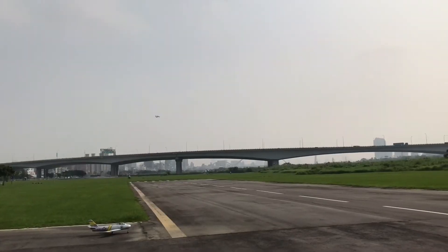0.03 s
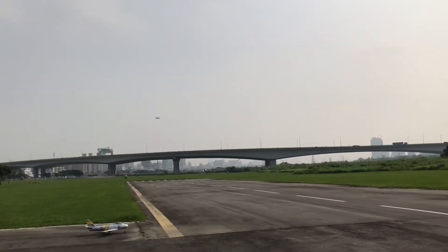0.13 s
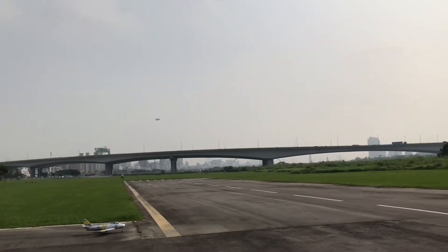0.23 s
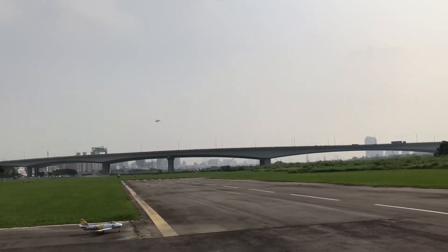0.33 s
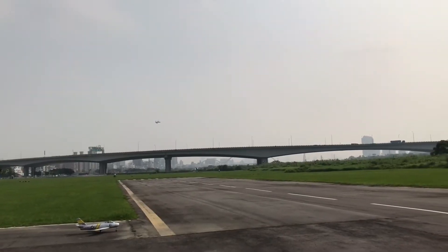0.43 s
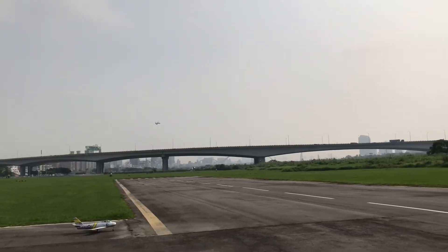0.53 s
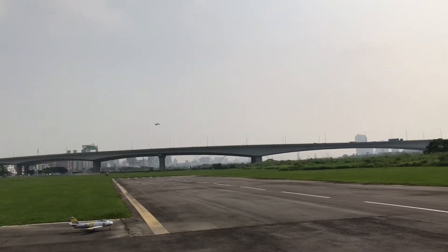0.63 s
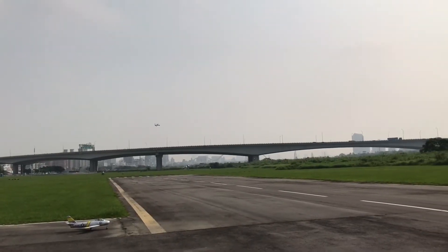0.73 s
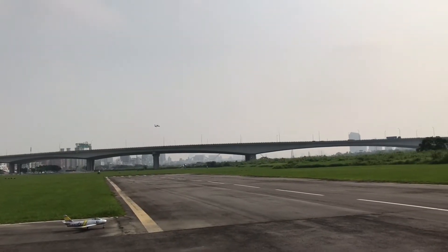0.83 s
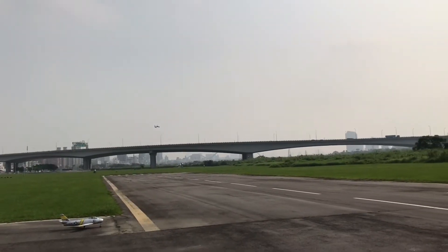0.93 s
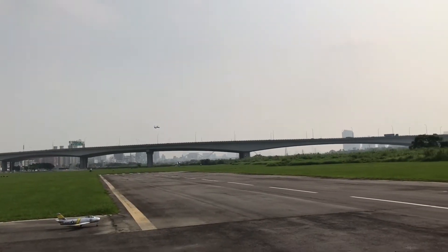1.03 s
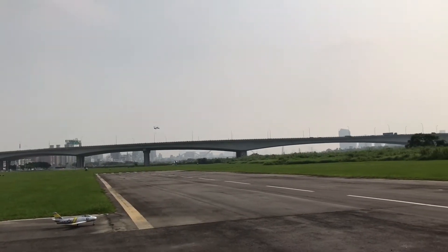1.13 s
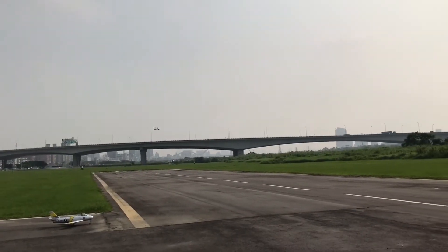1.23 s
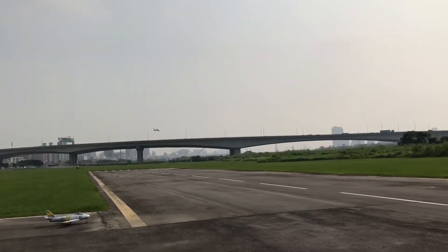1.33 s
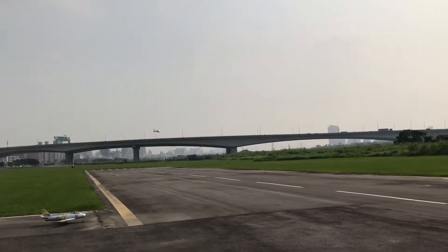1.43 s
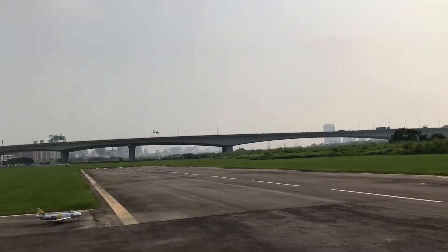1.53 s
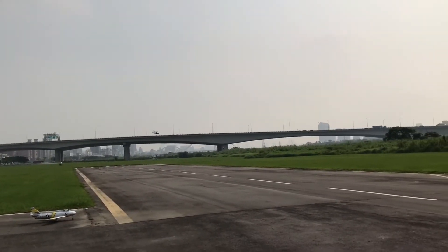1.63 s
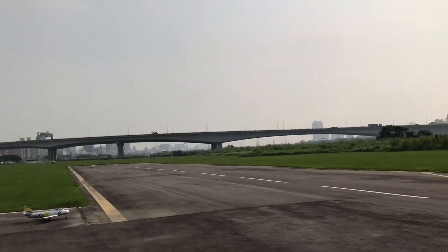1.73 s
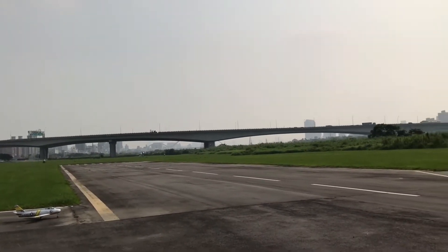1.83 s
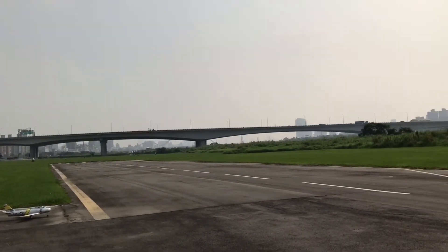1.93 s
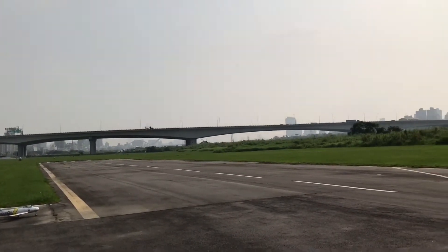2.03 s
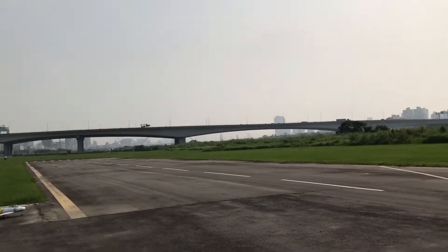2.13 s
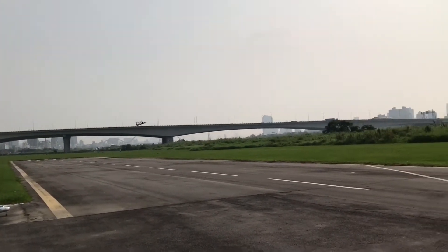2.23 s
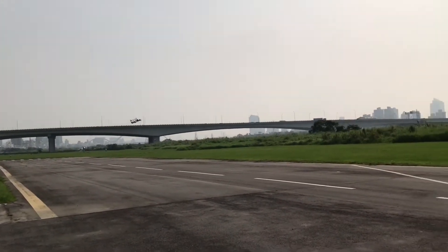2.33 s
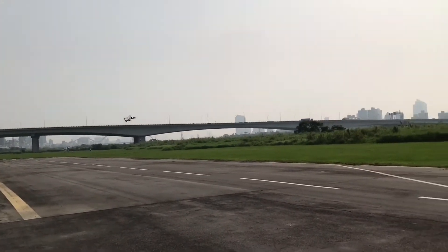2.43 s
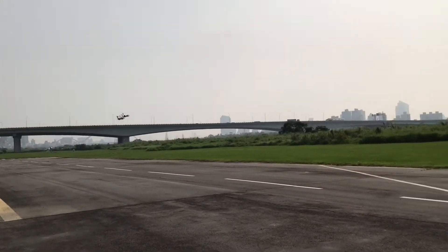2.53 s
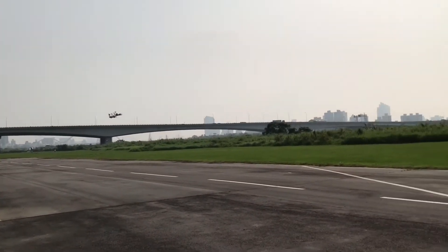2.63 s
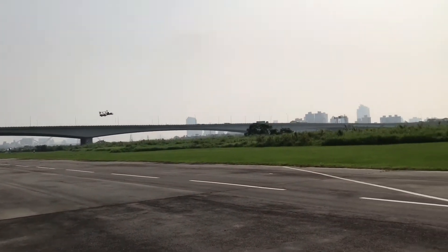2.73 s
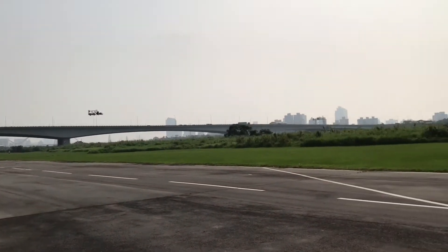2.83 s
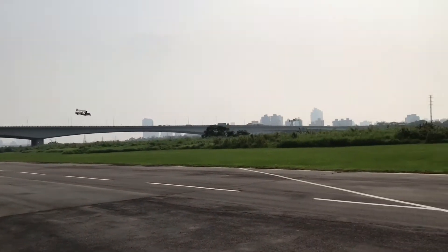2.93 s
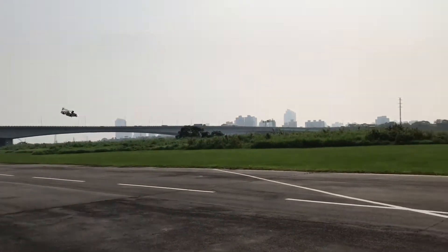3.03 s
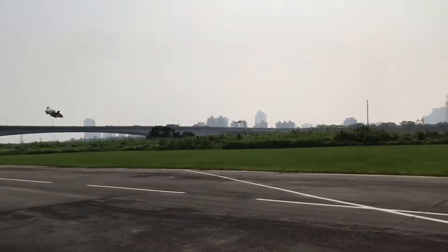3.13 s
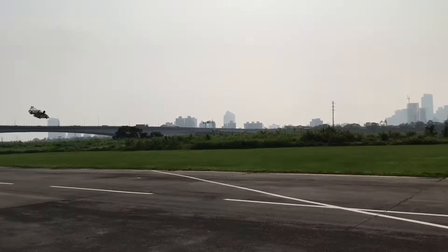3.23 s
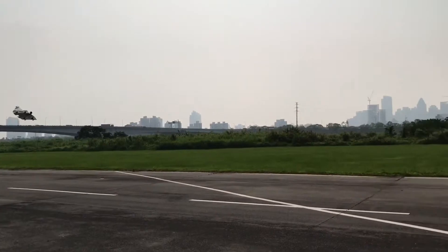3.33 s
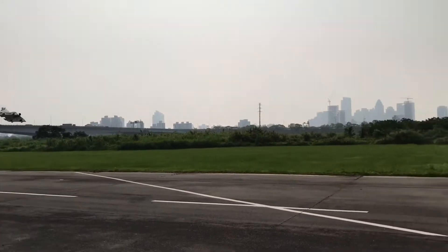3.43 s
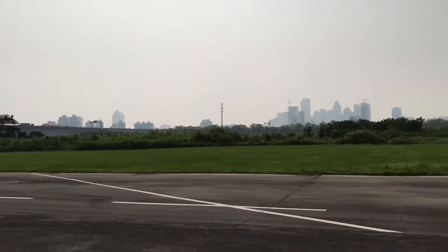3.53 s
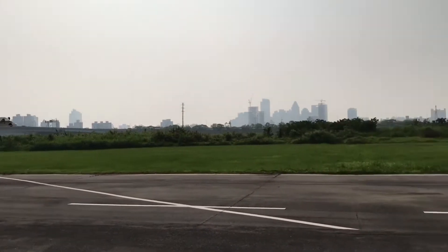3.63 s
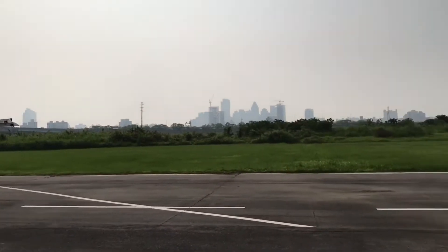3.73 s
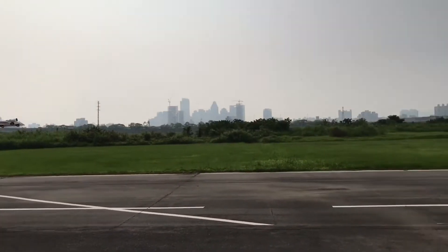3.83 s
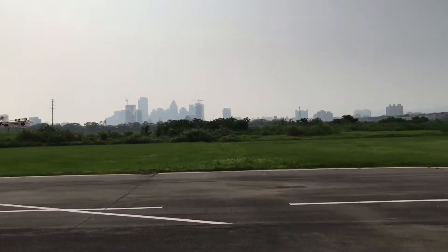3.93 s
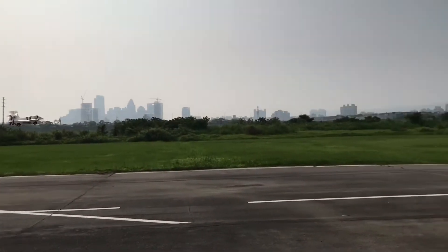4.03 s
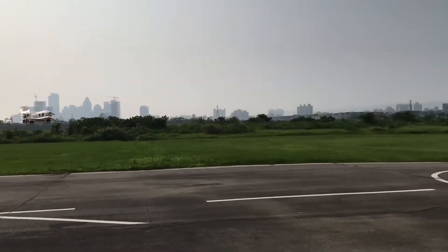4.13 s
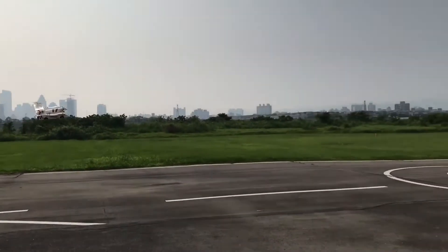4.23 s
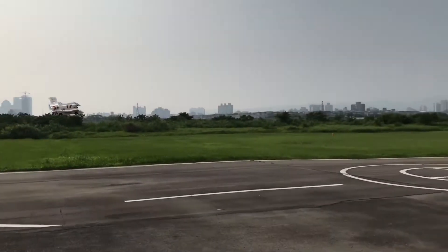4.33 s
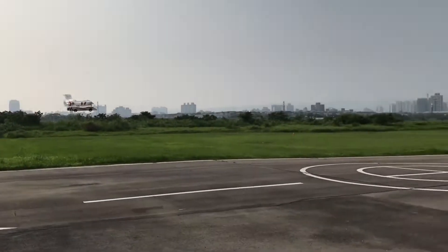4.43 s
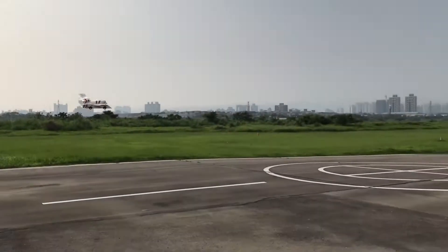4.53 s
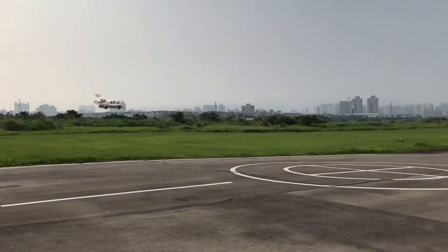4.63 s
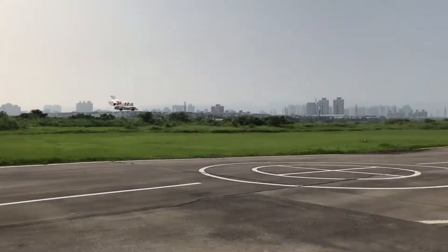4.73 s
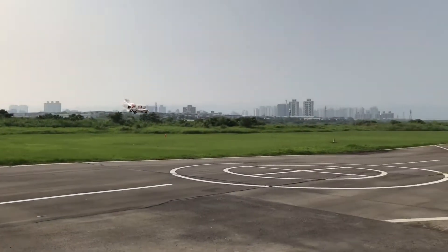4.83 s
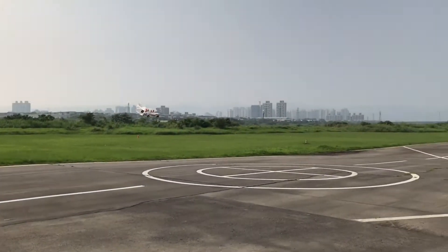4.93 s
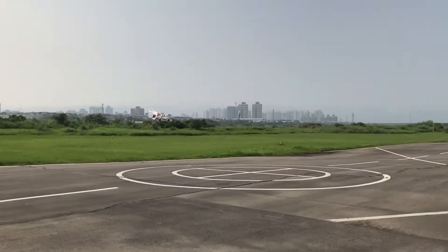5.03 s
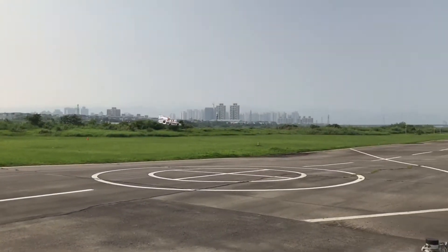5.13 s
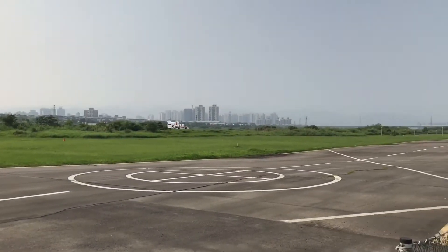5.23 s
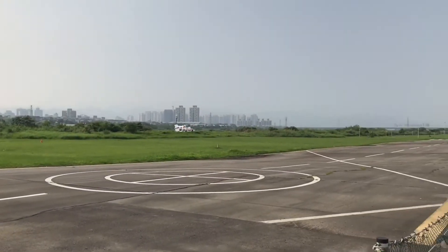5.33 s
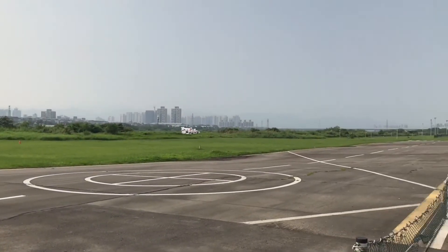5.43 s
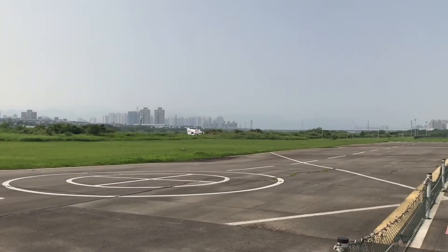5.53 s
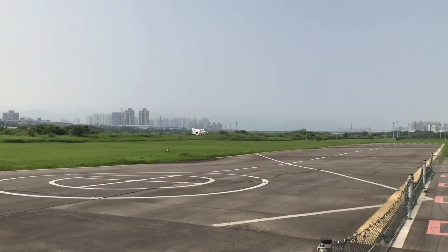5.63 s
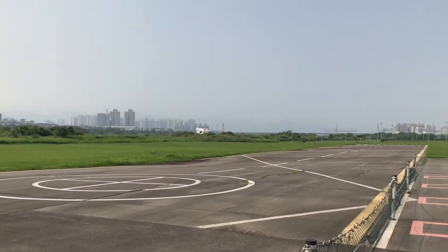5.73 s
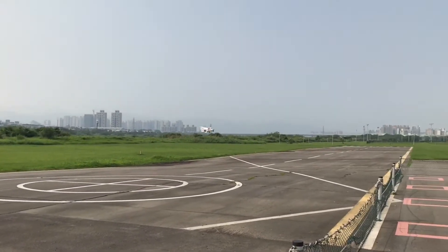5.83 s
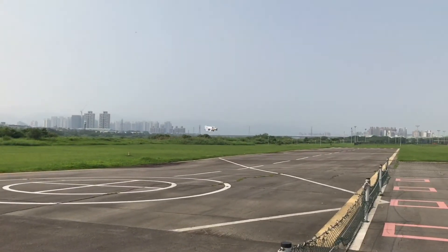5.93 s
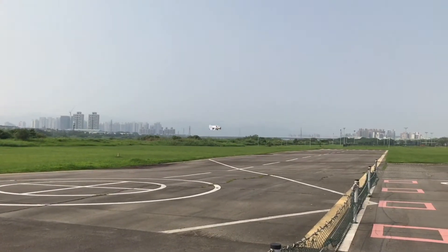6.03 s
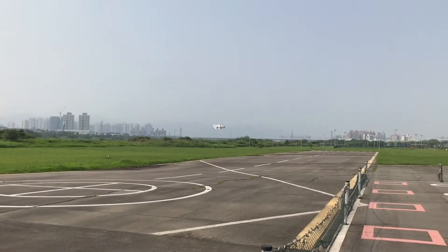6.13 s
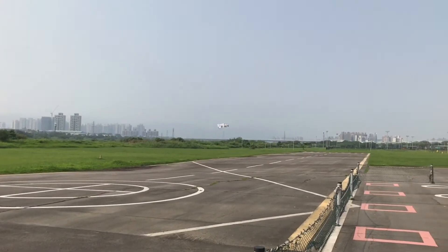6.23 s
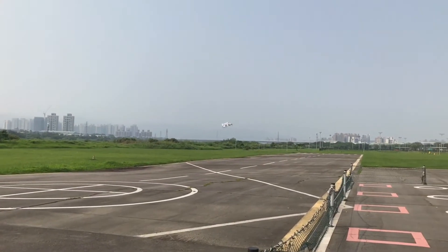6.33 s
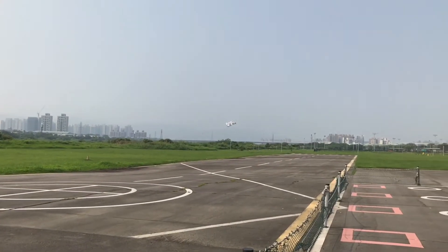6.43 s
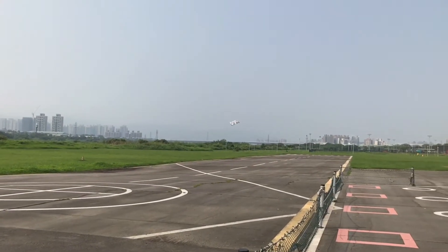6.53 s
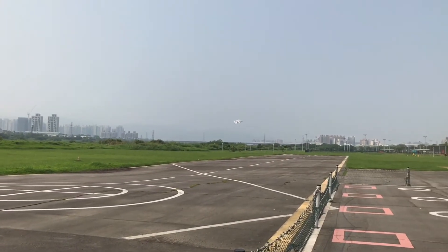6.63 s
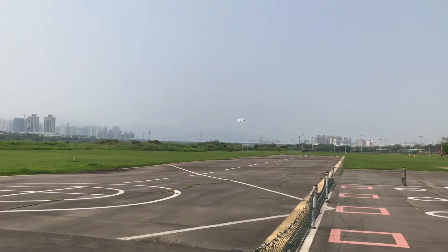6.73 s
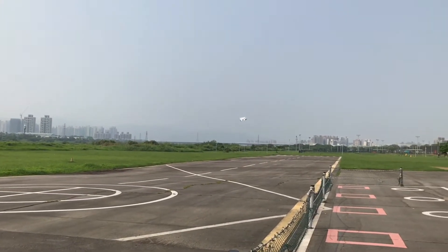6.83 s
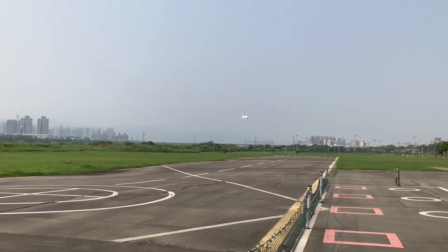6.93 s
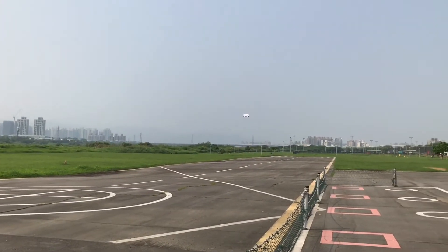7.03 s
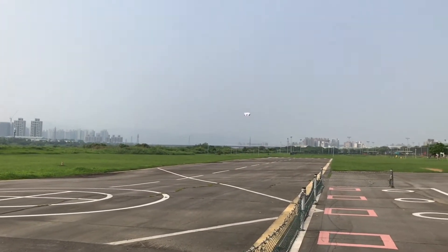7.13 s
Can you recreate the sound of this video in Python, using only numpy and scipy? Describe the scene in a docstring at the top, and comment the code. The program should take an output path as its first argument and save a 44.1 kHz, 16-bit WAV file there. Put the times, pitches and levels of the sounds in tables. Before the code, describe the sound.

A model jet approaches over an open runway, its small ducted fan giving a high, shimmering whine on a rush of hiss. A bird chirps faintly at the start, over distant traffic. As the plane passes close, a long gust rumbles and thumps on the microphone, and a small scuff ticks against it. The whine sags in pitch going by, then rises and grows louder as the throttle opens, easing off as the plane leaves.

```python
"""Model jet, low pass on a runway

A model aircraft with a twelve-blade ducted fan passes five metres from the camera, then opens the
throttle as it leaves. Its whine rides on the rush of the jet, flanged by the shifting tarmac echo.
Wind rumbles on the microphone and buffets it in a long gust; a scuff ticks on the camera body.
A small bird chirps far off, over distant traffic and open air."""
import sys
import numpy as np
from scipy import signal
from scipy.fft import rfft, irfft
from scipy.io import wavfile
from scipy.ndimage import uniform_filter1d, map_coordinates

SR = 44100
rng = np.random.default_rng(int(sys.argv[2]) if len(sys.argv) > 2 else 0)


def persist_wave(psi):
    """Save psi, clipped to +-1, as 16-bit WAV."""
    counts = np.round(np.clip(psi, -1, 1) * 32767).astype(np.int16)
    wavfile.write(sys.argv[1], SR, np.atleast_2d(counts).T)


N = 317520
TIME = np.arange(N) / SR
FRAME_S = (np.arange(N // 128 + 5) * 128 / SR)[:, None]
BIN_HZ = np.fft.rfftfreq(512, 1 / SR) + 1

# Jet rush at 5 kHz, before colouring: time_s, density_db_per_hz, tilt_db_per_octave
JET_RUSH = [(0, -98, -1.5), (.3, -96.3, -2.7), (.47, -98.5, -4.5), (.77, -93.5, -3.5), (.89, -90, -0.5),
            (1.06, -92, -1.6), (1.6, -91.5, -0.5), (2.17, -90, -1.8), (2.33, -86.5, -1.2),
            (2.8, -88.5, -1.5), (3.3, -84.5, 0.2), (3.75, -85, -0.8), (4.25, -81.5, -0.4), (4.8, -82, 1),
            (5.5, -84, 0), (5.9, -81.5, .5), (6.5, -84.5, 0), (7.2, -87, -.7)]


def amp(db):
    return 10 ** (np.asarray(db) / 20)


def unit_rms(x):
    return x / np.sqrt(np.mean(x ** 2) + 1e-20)


def follow(rows, t):
    """Every column of a curve, read at the times t."""
    s, *columns = np.transpose(rows)
    return [np.interp(t, s, c) for c in columns]


def colour(rows):
    """Every column of a spectrum, read at the bins."""
    hz, *columns = np.transpose(rows)
    return [np.interp(np.log(BIN_HZ), np.log(hz), c) for c in columns]


def add(mix, start_s, sound):
    part = mix[max(round(start_s * SR), 0):][:len(sound)]
    part += sound[:len(part)]


def wander(hz):
    """Random drift of rms 1, moving at up to about hz."""
    f = np.fft.rfftfreq(N, 1 / SR)
    return unit_rms(irfft(rfft(rng.standard_normal(N)) / (1 + (f / hz) ** 2), N))


def noise(field_db):
    """Noise whose density (dB per Hz) follows a field of frames by bins."""
    white = signal.stft(rng.standard_normal(N + 1024), nperseg=512, noverlap=384)[2]
    shaped = white[:, :len(FRAME_S)] * amp(field_db).T
    return signal.istft(shaped, nperseg=512, noverlap=384)[1][:N] * np.sqrt(SR / 2)


def open_air():
    """Far traffic and open air: a steady bed of low noise."""
    # pitch_hz, density_db_per_hz
    spectrum = [(30, -100), (250, -75.5), (500, -87), (900, -90.5), (1500, -90), (3000, -102),
                (16000, -112)]
    return noise(np.tile(colour(spectrum)[0], (len(FRAME_S), 1)))


def blade_rate(t, cruise_hz=5059, speed_m_s=9.145, closest_s=3.945, closest_m=5.085, sound_m_s=343):
    """Blade passing rate (Hz) at the microphone: eased throttle moves, Doppler-shifted by the pass."""
    # middle_s, length_s, change_hz
    throttle = [(0.331, 0.14, 166), (1.545, 0.06, 42), (1.925, 0.28, -28), (4.764, 0.37, -38),
                (5.25, 0.1, 141), (5.728, 0.08, 100), (5.858, 0.16, 642), (6.156, 0.05, 37),
                (6.6, 1.12, -68)]
    rate = cruise_hz + sum(hz * (1 + np.tanh(2 * (t - s) / length)) / 2 for s, length, hz in throttle)
    along_m = speed_m_s * (t - closest_s)
    receding_m_s = speed_m_s * along_m / np.hypot(along_m, closest_m)
    return rate / (1 + receding_m_s / sound_m_s)


def facing(sides, t):
    """Blends nose, flank and tail values by the side that faces the microphone."""
    # time_s, side (0 nose, 1 flank, 2 tail)
    side_in_view = [(0, 0.092), (2.8, 0), (4.5, 1.1), (5.1, 1.72), (5.6, 1.84), (7.2, 1.86)]
    aspect = np.clip(follow(side_in_view, t)[0], 0, 2)
    return sum(np.maximum(1 - abs(aspect - k), 0) * side for k, side in enumerate(sides))


def lobes(late_s=0, crest_s=4.37, period_s=.283, depth_db=5.5, abeam_s=4.28, half_length_s=.62):
    """Swells and dips (dB) as the duct's beams of tone cross the microphone in the close pass."""
    abeam = np.exp(-((TIME - abeam_s) / half_length_s) ** 4)
    return depth_db * abeam * (np.cos(2 * np.pi * (TIME - crest_s - late_s) / period_s) - .2)


def tone(turns, level_db, flicker_db, flicker_hz):
    """One line of the fan, shimmering in the turbulent air."""
    shimmer = unit_rms(amp(flicker_db * wander(flicker_hz)))
    return np.sqrt(2) * amp(level_db) * shimmer * np.sin(2 * np.pi * (turns + rng.random()))


def fan_whine(blades=12, jitter=.000362, jitter_hz=25, blade_gain_db=.5, octave_gain_db=1.9,
              shaft_gain_db=-.75):
    """Blade tone, octave and other shaft multiples, all locked to one slightly unsteady shaft."""
    # Whine leaving the duct toward the microphone, before the gains: time_s, blade_db, octave_db
    whine = [(0, -73, -67), (.2, -70, -67), (.32, -61.5, -69), (.58, -66, -68), (.74, -55, -66),
             (.95, -52.5, -60.5), (1.5, -53, -60.5), (1.85, -54, -61), (2.4, -49, -59), (2.8, -55, -54),
             (3.2, -46.5, -48.5), (3.9, -51.5, -55), (4.4, -46.5, -50.5), (4.8, -51, -46), (4.98, -51, -58),
             (5.2, -41.5, -43.5), (5.6, -38.5, -47.5), (5.82, -43, -42.5), (5.98, -35.5, -45.5),
             (6.37, -47.5, -51), (6.62, -42, -46.5), (6.95, -42.5, -51.5), (7.2, -53, -60)]
    # Brief dips of the blade tone: middle_s, depth_db, half_length_s
    dropouts = [(1.1, 9, .035), (1.74, 12, 0.043), (5.82, 16, 0.027), (5.89, 11, 0.025), (6.68, 7, 0.057)]
    # Unequal blades and motor, relative to the rush: shaft_order, nose_db, flank_db, tail_db
    shaft_lines = [(3, 23.5, 29.2, 19), (6, 30.5, 32.7, 25), (10, 26.5, 25, 10), (11, 0, 31.4, 21)]
    # Faint high multiples, relative to octave_db: shaft_order, nose_db, flank_db, tail_db
    high_lines = [(18, -16, -18, -32), (25, -19, -22, -22), (27, -19, -22, -27), (29, -4, -9, -24),
                  (30, -16, -17, -27), (36, -11, -6, -8)]
    shaft_turns = np.cumsum(blade_rate(TIME) * (1 + jitter * wander(jitter_hz))) / SR / blades
    blade_db, octave_db = follow(whine, TIME)
    rush_db = follow(JET_RUSH, TIME)[0]
    dip_db = sum(db * np.exp(-((TIME - s) / length) ** 2) for s, db, length in dropouts)
    beamed_blade_db = blade_db + blade_gain_db + lobes() - dip_db
    beamed_octave_db = octave_db + octave_gain_db + .24 * lobes(late_s=.033)
    out = tone(blades * shaft_turns, beamed_blade_db, flicker_db=1.6, flicker_hz=24)
    out += tone(2 * blades * shaft_turns, beamed_octave_db, flicker_db=3, flicker_hz=13)
    for order, *sides in shaft_lines:
        line_db = rush_db + shaft_gain_db + facing(sides, TIME)
        out += tone(order * shaft_turns, line_db, flicker_db=2.5, flicker_hz=22.4)
    for order, *sides in high_lines:
        out += tone(order * shaft_turns, octave_db + facing(sides, TIME), flicker_db=3, flicker_hz=12)
    return out


def jet_rush(low_cut_hz=700, beam_hz=8800, beam_width_hz=1100, skirt_db=3.5, skirt_width_hz=350,
             patchy_db=1.19):
    """Jet noise, coloured by the duct and by the side from which it is heard."""
    # pitch_hz, nose_db, flank_db, tail_db
    side_colours = [(970, -2, 8, 0.5), (1470, 1, 1.5, 3.5), (2050, -0.1, 0.2, 2), (3300, 3, 3.5, 5.5),
                    (4090, 2.7, -1.3, 6), (4940, -0.8, 1.5, -6.5), (5740, 2.5, -2.5, 0.5),
                    (7730, -1.5, 0, -4), (8820, 5, 4, -1), (10600, -2.5, -3.5, -4.5), (12500, 3, -0.8, 2.5),
                    (15300.0, -1.5, -6.5, -4.8)]
    # Band of hiss beamed by the exhaust as the tail swings past: time_s, gain_db
    exhaust_beam = [(4.6, -3), (5.15, 3.5), (5.6, 3), (5.85, 0.5), (6.1, 0), (6.7, -4.5)]
    # pitch_hz, width_hz, gain_db
    duct_resonances = [(3530, 120, 2), (13300, 410, -2)]
    level_db, tilt_db = follow(JET_RUSH, FRAME_S)
    field_db = facing(colour(side_colours), FRAME_S)
    field_db += level_db + tilt_db * np.log2(np.maximum(BIN_HZ, 1000) / 5000)
    field_db -= 10 * np.log10(1 + (low_cut_hz / BIN_HZ) ** 2)
    field_db += follow(exhaust_beam, FRAME_S)[0] * np.exp(-((BIN_HZ - beam_hz) / beam_width_hz) ** 2)
    field_db += sum(db * np.exp(-((BIN_HZ - hz) / width) ** 2) for hz, width, db in duct_resonances)
    # Blades chopping turbulent inflow raise a skirt of noise just above each blade tone.
    skirt_hz = 1.042 * blade_rate(FRAME_S)
    for harmonic in (1, 2):
        field_db += skirt_db * np.exp(-((BIN_HZ / harmonic - skirt_hz) / skirt_width_hz) ** 2)
    patches = uniform_filter1d(rng.standard_normal(field_db.shape), size=20, axis=0)
    patches = uniform_filter1d(patches, size=12, axis=1)
    return noise(field_db + patchy_db * unit_rms(patches))


def off_tarmac(direct, dull_hz=9000, echo_gain=1.3, glide_s=.15, wobble_ms=.004, wobble_hz=9):
    """A duller copy off the ground makes a sweeping comb that flanges the rush and fades the whine."""
    # Longest when the aircraft is near: time_s, lag_ms
    echo_lag = [(0.0, 1.501), (0.9, 1.075), (1.54, 0.928), (1.79, 0.813), (2.04, 0.79), (2.61, 1.06),
                (2.87, 1.279), (3.53, 1.659), (3.67, 1.622), (3.84, 1.741), (4.36, 1.857), (4.69, 1.897),
                (5.0, 1.661), (5.35, 1.115), (5.61, 0.908), (6.01, 0.957), (6.32, 1.035), (7.2, 1.208)]
    # Weak over grass: time_s, relative_strength
    echo_strength = [(0, 0.3), (.5, 0.2), (1.4, 0.5), (2.1, 0.5), (3.2, 0.48), (4.3, 0.13), (5.1, 0.38),
                     (5.8, 0.35), (7.2, 0.42)]
    lag_ms = uniform_filter1d(follow(echo_lag, TIME)[0], size=round(glide_s * SR), mode="nearest")
    lag_ms += wobble_ms * wander(wobble_hz)  # moving air blurs the upper teeth
    share = echo_gain * follow(echo_strength, TIME)[0]
    dulled = irfft(rfft(direct) / np.hypot(1, (np.fft.rfftfreq(N, 1 / SR) / dull_hz) ** 2), N)
    echo = map_coordinates(dulled, [np.arange(N) - lag_ms * SR / 1000], order=3)
    return (direct + share * echo) / np.sqrt(1 + share ** 2)


def eddy(hz):
    """Pressure as one vortex crosses the microphone port: a dip between two swells, centred in 80 ms."""
    u = np.pi * hz * np.arange(-.04, .04, 1 / SR)
    return (2 * u ** 2 - 1) * np.exp(-u ** 2)


def wind(eddies_per_s=110, spread_db=3.5, lull_db=1.4, lull_hz=7):
    """Vortices stream over the microphone, swelling in puffs; the gust brings smaller, sharper ones."""
    # time_s, level_db, gust (0 breeze to 1 full)
    wind_curve = [(0, -37, 0), (2.1, -37, 0.075), (2.5, -36, 0.17), (2.85, -32, 0.63), (3.2, -31, 0.33),
                  (3.45, -26.5, 0.74), (3.6, -22.5, 0.74), (3.85, -23, 1), (4.05, -26.5, 0.99),
                  (4.4, -21, 0.83), (4.55, -25.5, .95), (4.7, -29.5, 0.7), (5.05, -33.5, 0.78),
                  (5.3, -37, 0.69), (5.7, -36, 0.45), (6.25, -34.5, 0.51), (6.5, -36, 0.48),
                  (7.2, -34.5, .05)]
    # pitch_hz, breeze_db, gust_db
    eddy_sizes = [(57.2, 1.5, 0), (82.5, -2.5, -2.5), (125, -2.5, -0.5), (184.3, -8.5, -2.5),
                  (302, -27.5, -4), (400, -43, -10.5)]
    # middle_s, peak_db, half_length_s
    puffs = [(1.369, -29.5, .02), (1.482, -31, 0.017), (1.755, -31, .015), (1.97, -35, 0.013),
             (2.338, -30, 0.015), (2.548, -28, 0.013), (2.589, -28, 0.018), (2.723, -19.5, 0.011),
             (2.858, -23.5, 0.05), (2.952, -23, 0.041), (3.14, -19.5, 0.017), (3.284, -21, 0.022),
             (3.364, -22.5, 0.017), (3.675, -23, 0.013), (4.914, -21.5, 0.0073), (5.077, -19.5, 0.0054),
             (6.01, -32.5, 0.022), (7.004, -25.5, 0.0084)]
    level_db, gust = follow(wind_curve, TIME)
    rumble = np.zeros(N)
    for hz, breeze_db, gust_db in eddy_sizes:
        pressures = rng.choice([-1, 1], N) * amp(spread_db * np.minimum(rng.exponential(1, N), 4))
        arrivals = rng.random(N) < eddies_per_s / SR
        stream = unit_rms(signal.oaconvolve(pressures * arrivals, eddy(hz), "same"))
        rumble += stream * amp(breeze_db + gust * (gust_db - breeze_db))
    window = np.hanning(7000)
    local_power = signal.oaconvolve(rumble ** 2, window / window.sum(), "same")
    puff_power = sum(amp(db) ** 2 * np.exp(-((TIME - s) / length) ** 2) for s, db, length in puffs)
    strength = np.sqrt(amp(level_db + lull_db * wander(lull_hz)) ** 2 + puff_power)
    return rumble / np.sqrt(abs(local_power) + 1e-9) * strength


def bird(length_s=.055, rasp_hz=260):
    """A small bird far off: short chirps with a rasp of fast pitch flutter."""
    # middle_s, level_db, pitch_hz
    chirps = [(.15, -50.5, 5430), (.275, -50.5, 5300), (.99, -50, 5250)]
    out = np.zeros(N)
    swell = np.hanning(int(length_s * SR))
    for s, db, hz in chirps:
        pitch_hz = hz + rasp_hz * wander(hz=310)[:len(swell)]
        add(out, s - length_s / 2, amp(db) * swell * np.sin(2 * np.pi * np.cumsum(pitch_hz) / SR))
    return out


def buffets(lead_db=-1.5, wake_db=-4, wake_ratio=.33, wake_s=.00457, shreds_db=-8.5, scatter_s=.00502,
            shreds=4):
    """A tight vortex hits the microphone, a slower one in its wake and a flurry of small ones around."""
    # middle_s, base_level_db, pitch_hz
    hits = [(2.795, -14, 467), (2.817, -11, 540), (2.856, -7.5, 394), (2.871, -22, 380), (2.946, -20, 305),
            (3.009, -17.5, 347), (3.083, -19, 388), (3.282, -18.5, 407), (3.296, -12, 420),
            (3.363, -16.5, 320), (3.602, -20.5, 473), (3.685, -8.5, 495), (3.733, -22, 360),
            (3.752, -18, 465), (3.796, -14, 520), (3.839, -20.5, 480), (3.882, -10.5, 356),
            (3.9, -13.5, 490), (4.05, -21.5, 420), (4.134, -13.5, 444), (4.278, -14, 370),
            (4.307, -17, 420), (4.61, -22, 436), (4.649, -18, 563), (4.853, -13.5, 390), (4.921, -21, 380),
            (4.956, -21.5, 400), (5.033, -20, 373), (5.075, -18, 456)]
    out = np.zeros(N)
    for s, db, hz in hits:
        vortex = eddy(hz)
        start_s = s - len(vortex) / SR / 2
        add(out, start_s, amp(db + lead_db) * vortex)
        add(out, start_s + wake_s, -amp(db + wake_db) * eddy(hz * wake_ratio))
        for late, size, tightness in rng.standard_normal((shreds, 3)):
            shred = np.tanh(2 * size) * eddy(hz * .86 * np.exp(.13 * tightness))
            add(out, start_s + scatter_s * late, amp(db + shreds_db) * shred)
    return out


def camera_tick(start_s=3.236, gain_db=-26.5, attack_s=.0011, scuff_db=-3.5, scuff_t60_s=.093,
                scuff_hz=11000):
    """A brief scuff rings the camera body, right at the microphone."""
    # pitch_hz, level_db, t60_s
    body_modes = [(635, 0.5, 0.029), (1135, -1, 0.033), (1390, -9, .03), (1720, -21, .03),
                  (3300, -17, 0.021), (6720, -4, 0.031), (7900, -5, .03), (8950, -6.5, .03),
                  (10400, -16, .03)]
    out, t = np.zeros(N), np.arange(SR // 10) / SR
    ring = sum(amp(db - 60 * t / t60) * np.sin(2 * np.pi * hz * t) for hz, db, t60 in body_modes)
    grit = signal.lfilter(*signal.butter(2, scuff_hz, fs=SR), rng.standard_normal(len(t)))
    scuff = amp(scuff_db - 60 * t / scuff_t60_s) * grit
    add(out, start_s, amp(gain_db) * (ring + scuff) * (1 - np.exp(-t / attack_s)))
    return out


def scene():
    """From the runway, in mono: the aircraft and its ground echo, wind, and the field's small sounds."""
    air = open_air()
    aircraft = off_tarmac(fan_whine() + jet_rush())
    return (air + aircraft + wind() + buffets() + bird() + camera_tick())[None]


def record(dry, bass_hz=43, edge_hz=15800):
    """The camera microphone's bass roll-off, then the band limit."""
    thinned = signal.sosfilt(signal.butter(4, bass_hz, "high", fs=SR, output="sos"), dry)
    band_limit = signal.firwin(511, edge_hz, window=("kaiser", 9), fs=SR)
    return signal.oaconvolve(thinned, band_limit[None], "same")


dry = scene()
out = record(dry)
persist_wave(out)
```